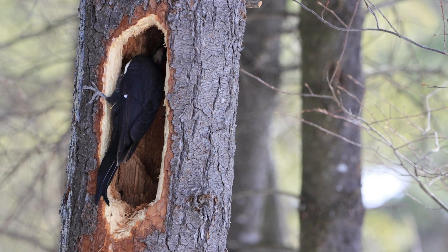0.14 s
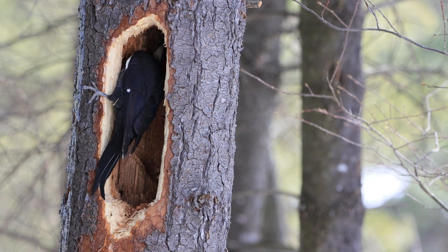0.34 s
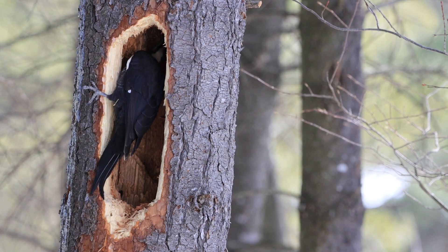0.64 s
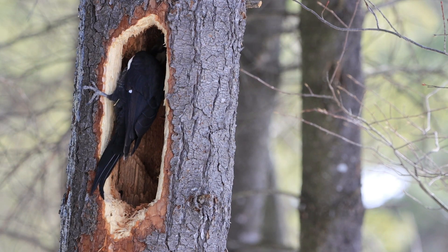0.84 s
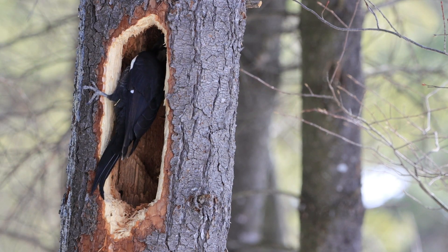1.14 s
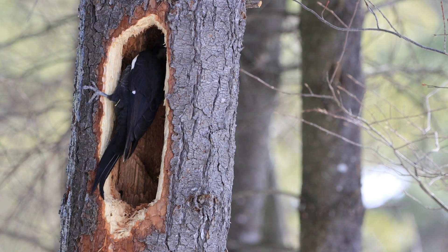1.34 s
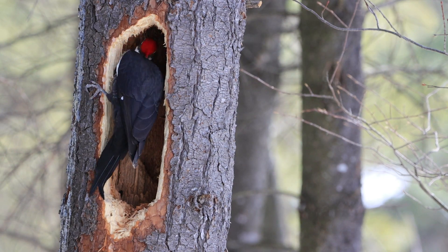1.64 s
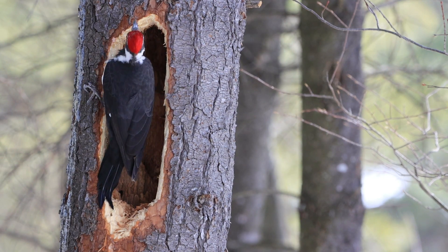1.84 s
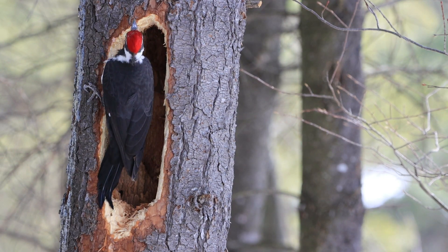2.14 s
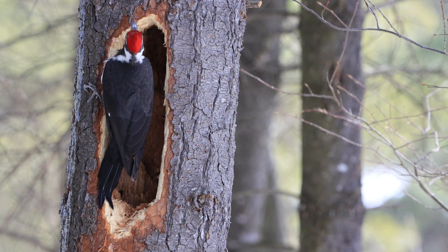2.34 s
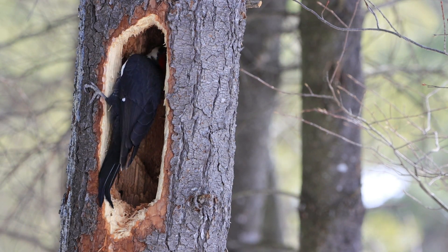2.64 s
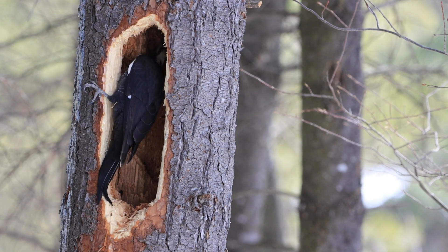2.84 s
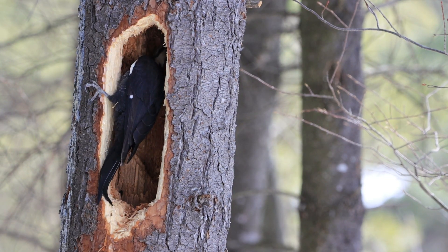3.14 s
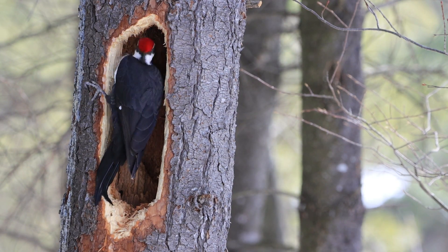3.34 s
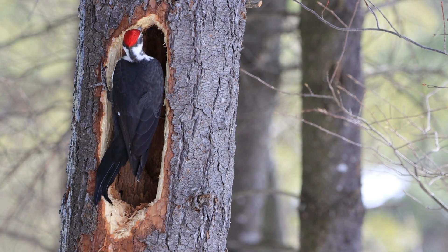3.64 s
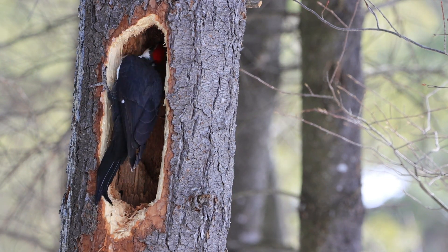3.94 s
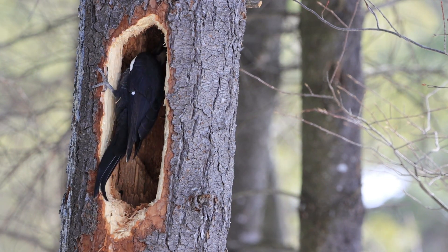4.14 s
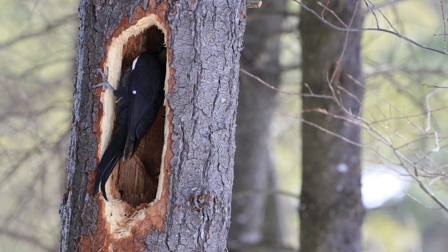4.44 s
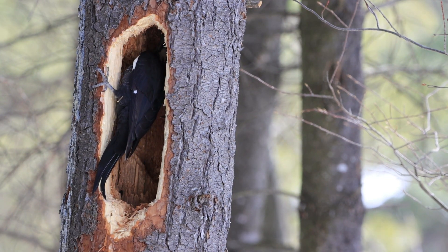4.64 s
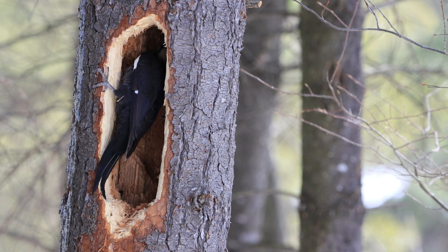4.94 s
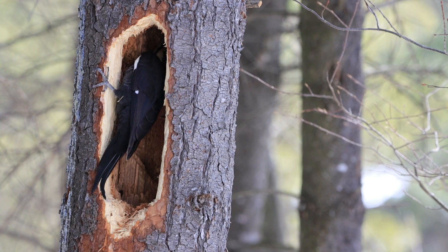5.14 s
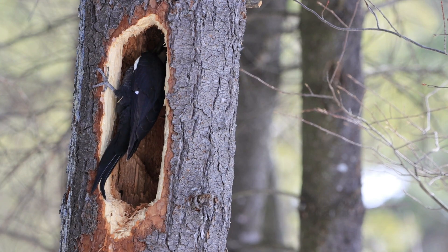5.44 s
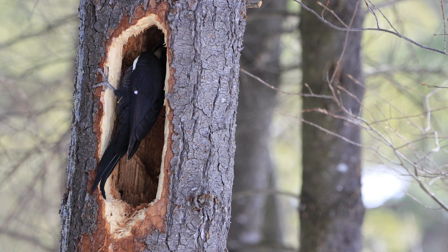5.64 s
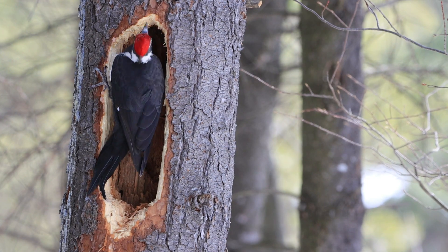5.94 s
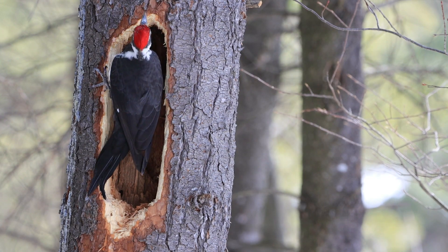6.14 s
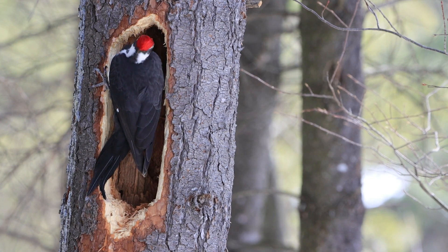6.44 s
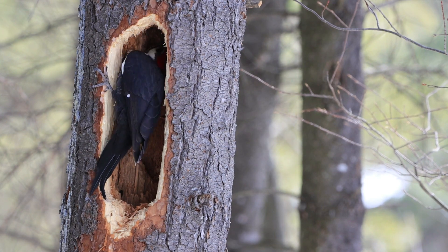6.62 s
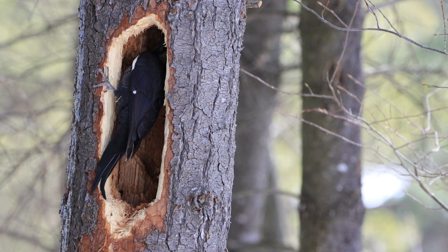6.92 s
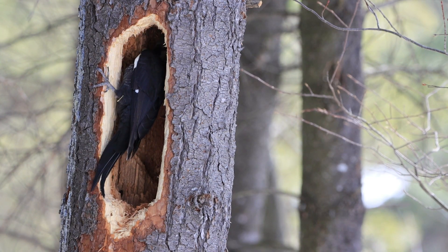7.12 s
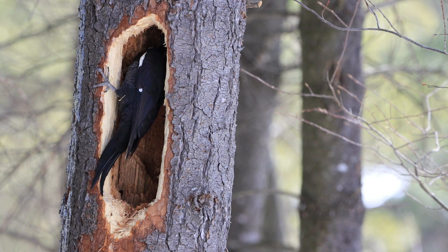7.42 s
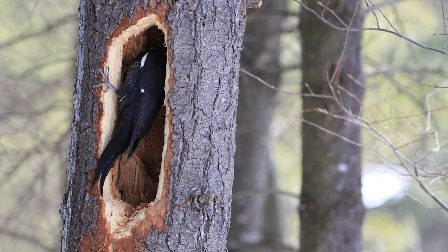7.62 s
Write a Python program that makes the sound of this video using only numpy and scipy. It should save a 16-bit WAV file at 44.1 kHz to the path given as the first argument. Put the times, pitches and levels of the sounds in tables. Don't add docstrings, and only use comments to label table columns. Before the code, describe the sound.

A quiet wood with soft air hiss, a throbbing high insect band, low distant rumble and a faint steady machine hum. From 0.3 to 1.1 s a small bird gives ten even, high chips, amid thin seeps and pips; a breathy high whistle follows at 1.3-1.8 s, with a tiny twig snap near 1.7. At 2.3 s a large woodpecker starts yelping: two or three softer, lower notes, then loud, bright, ringing ones about 0.12 s apart until 4.0, closing with a clipped higher note at 4.15. Trunks return each yelp. Over its start, two piercing whistles glide down, 2.4-2.8 s. Fuzzy high trills buzz near 3 and 5 s. Scattered chips and faint murmurs continue. From 5.65 s a distant bird repeats a quick four-note phrase, about three times a second, fading after 7 s as hiss and insects die away, leaving rumble and hum.

```python
import sys
import numpy as np
from scipy import signal
from scipy.io import wavfile
from scipy.ndimage import uniform_filter1d

SR = 44100
rng = np.random.default_rng(int(sys.argv[2]) if len(sys.argv) > 2 else 0)


def boost_factor(decibels):
    exponent = np.asarray(decibels, float) / 20
    return 10 ** exponent


def pcm_store(signal):
    levels = np.round(np.clip(np.atleast_2d(signal), -1, 1) * 32767)
    wavfile.write(sys.argv[1], SR, levels.astype(np.int16).T)


N = 343098
BIN_HZ = np.fft.rfftfreq(1024, 1 / SR)

# (frequency [Hz], level [dB])
RUMBLE_SHAPE = [(18, -52), (30, -32.5), (50, -6.5), (95, 0), (190, -5), (215, -8.5), (330, -15.5),
                (700, -15.5), (1100, -25), (1700, -30), (16000, -45)]


def evened(x):
    return x / np.sqrt(np.mean(x ** 2) + 1e-20)


def read(points, hz):
    f, value = np.transpose(points)
    return np.interp(np.log(hz + 1), np.log(f + 1), value)


def along(rows, column):
    rows = np.array(rows)
    return np.interp(np.arange(N) / SR, rows[:, 0], rows[:, column])


def add(mix, s, sound):
    part = mix[round(s * SR):][:len(sound)]
    part += sound[:len(part)]


def drift(count, hz):
    pole = np.exp(-np.pi * hz / SR)
    z = rng.standard_normal((count + 2000, 2)) @ [1, 1j]
    for _ in range(2):
        z = signal.lfilter([1], [1, -pole], z)
    z = z[2000:]
    return z / np.sqrt(np.mean(abs(z) ** 2))


def whistle(hz, rough, width_hz):
    rough = np.clip(rough, 0, 1)
    carrier = np.sqrt(1 - rough) + np.sqrt(rough) * drift(len(hz), width_hz)
    carrier = carrier / np.sqrt(np.mean(abs(carrier) ** 2))
    turns = np.cumsum(hz) / SR + rng.random()
    return (carrier * np.exp(2j * np.pi * turns)).real


def noise(shape_db, patchy_db):
    a, b, patches = rng.standard_normal((N // 256 + 5, 513, 3)).T
    patches = uniform_filter1d(uniform_filter1d(patches, 12, 0), 14, 1)
    z = (a + 1j * b) * boost_factor(shape_db[:, None] + patchy_db * evened(patches))
    return signal.istft(z, nperseg=1024, noverlap=768)[1][:N]


def note(s, length_s, start_hz, end_hz, db, rough, width_hz=300):
    hz = np.geomspace(start_hz, end_hz, int(length_s * SR))
    return s, boost_factor(db) * whistle(hz, rough, width_hz) * signal.windows.tukey(len(hz), .4)


def held(rows, rough, width_hz, trim_db):
    s, hz, db = np.transpose(rows)
    t = np.arange(s[0], s[-1], 1 / SR)
    tone = whistle(np.interp(t, s, hz), rough, width_hz)
    return s[0], boost_factor(np.interp(t, s, db) + trim_db) * tone * signal.windows.tukey(len(t), .08)


def arched(s, db, hz, length_s, drop, rough=0.25):
    u = np.linspace(-1, 1, int(length_s * SR))
    tone = whistle(hz * (1 - drop * u ** 2), rough, width_hz=60)
    return s, boost_factor(db) * tone * (1 - u ** 2) ** 0.69


def hiss():
    # (frequency [Hz], level [dB])
    air_shape = [(60, 7), (400, 10.5), (900, 8), (1500, 5.5), (2400, 9.5), (4400, 4.5), (6800, 9.5),
                 (8200, 1), (9600, -3), (16000, 3)]
    return boost_factor(9.5) * evened(noise(read(air_shape, BIN_HZ), patchy_db=.9))


def insects():
    # (centre [Hz], width [Hz], level over the air [dB])
    bands = [(5417, 450, -1.5), (5837, 310, 2)]
    chorus = np.zeros(N)
    for hz, width_hz, db in bands:
        throb = 1 + 0.086 * evened(drift(N, hz=40.8).real)
        chorus += boost_factor(db + 7.5) * throb * whistle(np.full(N, hz), rough=0.96, width_hz=width_hz)
    return chorus


def woodland_air():
    # (time [s], level [dB])
    swell = [(0.0, -62.5), (0.13, -62), (1.1, -56.5), (1.82, -56), (2.66, -54.5), (3.16, -55.5), (4.9, -56),
             (5.83, -60), (6.69, -63.5), (7.19, -70.5), (7.52, -78.5), (7.78, -93.5)]
    return (hiss() + insects()) * boost_factor(along(swell, 1))


def rumble():
    # (frequency [Hz], side under mid [dB])
    side_shape = [(30, -22), (150, -19.5), (300, -10.5), (800, -3), (1700, -0.5), (16000, -2.5)]
    mid = noise(read(RUMBLE_SHAPE, BIN_HZ), patchy_db=-0.5)
    side = noise(read(RUMBLE_SHAPE, BIN_HZ) + read(side_shape, BIN_HZ), patchy_db=-1.4)
    return boost_factor(-49.5) / np.std(mid) * np.array([mid + side, mid - side])


def hum():
    # (time [s], shared level [dB], left-minus-right level [dB])
    paths = [(0.0, -50, -69), (2.06, -48.5, -72), (2.2, -50.5, -72), (3.77, -51, -68.5),
             (4.33, -48.5, -68.5), (5.61, -51, -62), (5.92, -50, -62.5), (6.35, -56.5, -62.5),
             (6.57, -55, -63), (7.02, -48.5, -63.5), (7.78, -46.5, -65)]
    turns = 2 * np.pi * 287.7 * np.arange(N) / SR
    mid = np.sqrt(2) * boost_factor(along(paths, 1)) * np.sin(turns)
    side = np.sqrt(2) * boost_factor(along(paths, 2)) * np.sin(turns + 1.0)
    return np.array([mid + side, mid - side])


def far_chorus(mix):
    # (time [s], peak [dB])
    swells = [(.1, -56.5), (.4, -50.5), (.67, -48.5), (.98, -57), (4.9, -64), (5.1, -52), (5.369, -53),
              (5.665, -47)]
    hz, rise_s, fall_s, edge_db = 2373, 0.05, 0.174, -22
    for s, db in swells:
        curve = [(s - rise_s, hz, edge_db), (s, hz, 0), (s + fall_s, hz, edge_db)]
        add(mix, *held(curve, rough=0.99, width_hz=92, trim_db=db - 1.0))


def scattered_birds(mix):
    # (time [s], length [s], start pitch [Hz], peak [dB])
    flicks = [(.225, .05, 6370, -51), (.27, .03, 6920, -56), (4.183, 0.0348, 3570, -50.5),
              (4.302, 0.037, 2764, -44), (4.518, 0.046, 2940, -49), (4.812, 0.045, 2880, -47.5),
              (5.095, 0.066, 2740, -50), (5.17, 0.068, 3080, -51), (5.39, 0.053, 2800, -49.5),
              (5.41, .04, 3340, -51.5)]
    pips = [(.233, 0.037, 3750, -50), (.862, 0.022, 4500, -40), (.89, .05, 4400, -49),
            (1.16, .05, 4170, -46), (1.05, .03, 4550, -49), (1.28, .025, 4550, -50), (1.34, .02, 4560, -46),
            (1.358, .022, 4850, -43), (1.512, 0.03, 4140, -43), (1.205, .02, 3170, -49),
            (1.535, .022, 4560, -38), (1.56, .04, 4330, -46), (1.665, 0.03, 4050, -43),
            (1.72, .08, 4050, -47), (1.69, .02, 4520, -43), (1.705, .025, 4720, -41),
            (1.83, .018, 4480, -39), (1.86, .02, 4400, -46), (2.045, .04, 3330, -47),
            (1.88, .025, 2250, -49), (2.155, .03, 2250, -48), (2.543, .036, 4130, -47.5),
            (2.695, 0.022, 4740, -40.5), (3.25, .032, 4030, -43.5), (.945, .045, 3320, -42),
            (1.01, .04, 3280, -50), (.75, .03, 2880, -51), (6.708, 0.029, 3690, -53),
            (6.782, .025, 3225, -47.5), (1.47, .04, 2320, -50), (1.675, .025, 2300, -49),
            (5.13, .12, 3650, -54), (4.84, .1, 3650, -56)]
    slurs = [(.493, .174, 8570, -58), (2.45, 0.054, 8900, -35), (5.48, .07, 6900, -44),
             (5.5, .06, 8500, -50), (3.18, .14, 8500, -51.5), (3.998, .099, 6780, -45),
             (5.55, .12, 8700, -58), (4.66, .07, 8800, -51), (6.65, .05, 8600, -54)]
    seeps = [(.645, 0.027, 6450, -37.5), (.93, 0.031, 7660, -37), (1.097, 0.025, 8050, -43),
             (1.14, 0.022, 6540, -37), (1.213, 0.018, 6410, -36), (1.26, 0.09, 8450, -49),
             (1.16, .1, 8950, -50), (2.16, 0.17, 9250, -59.5), (2.258, 0.065, 8440, -52),
             (3.33, 0.08, 6230, -40.5), (3.685, 0.026, 8730, -42), (4.086, .012, 7800, -38.5),
             (4.533, 0.018, 7290, -36), (4.05, .04, 6280, -44), (4.55, .11, 7900, -46),
             (5.364, .027, 6910, -44), (5.402, 0.032, 7400, -47), (5.97, .03, 7720, -60),
             (6.135, .02, 8200, -51), (5.365, .02, 8700, -48), (6.443, 0.013, 7840, -40),
             (6.49, 0.02, 6900, -44), (6.5, .1, 7700, -52), (6.49, .05, 8350, -56), (6.52, .08, 9150, -57),
             (3.74, .04, 6500, -48), (4.16, .17, 9000, -56), (3.89, .05, 8950, -58), (3.98, .02, 8450, -53),
             (7.343, .014, 7710, -54), (7.168, 0.023, 6450, -50), (7.191, 0.034, 6900, -51)]
    drops = [(.955, 0.018, 2800, -43.5), (4.585, 0.018, 2300, -42), (1.072, 0.0146, 2780, -33),
             (1.218, 0.018, 2780, -36), (4.427, 0.0275, 2770, -42), (4.558, 0.027, 2750, -40)]
    holds = [(.96, 0.028, 2363, -44.5), (1.083, 0.025, 2370, -38.5), (1.228, 0.044, 2370, -38),
             (1.275, 0.022, 2320, -40), (4.445, 0.035, 2410, -45), (4.575, .04, 2380, -34.5),
             (5.365, 0.036, 2320, -46.5)]
    dives = [
        (2.006, .075, 4610, -50),
        (3.705, .039, 8870, -41.5),
    ]
    rips = [
        (4.078, .012, 6400, -39),
        (6.432, .016, 6370, -36.5),
    ]
    murmurs = [(4.78, 0.39, 1340, -51.5), (4.87, 0.27, 1720, -57.5), (5.19, .04, 1740, -55),
               (5.478, 0.056, 960, -49), (6.076, 0.081, 1363, -49.5), (6.15, 0.31, 1527, -54)]
    # (table, end pitch over start pitch, roughness 0-1, flutter [Hz])
    kinds = [(flicks, 1.27, 0.95, 700), (pips, 1.01, 0.55, 200), (slurs, .9, .6, 390),
             (seeps, 0.98, 0.36, 440), (drops, .9, 0.35, 250), (holds, .99, .6, 150),
             (dives, .715, 0.5, 400), (rips, 1.26, .15, 300), (murmurs, 1.005, 0.98, 310)]
    for table, slide, rough, flutter_hz in kinds:
        for s, length_s, hz, db in table:
            add(mix, *note(s, length_s, hz, hz * slide, db - 2.5, rough, flutter_hz))


def hooked_strokes(mix):
    # (time [s], length [s], top pitch [Hz], peak [dB])
    hooks = [(0.303, .3, 8450, -68), (1.1, .28, 8950, -62), (4.538, 0.21, 9370, -58),
             (5.37, 0.18, 9100, -56.5), (5.403, 0.13, 7660, -48.5), (7.159, 0.19, 8780, -69),
             (7.188, 0.14, 7350, -62)]
    top_at, rise, fall = .25, 0.0454, 0.22
    for s, length_s, hz, db in hooks:
        u = np.linspace(0, 1, int(length_s * SR))
        rising = rise * (1 - u / top_at) ** 2
        falling = fall * ((u - top_at) / (1 - top_at)) ** 2
        pitch_hz = hz * (1 - np.where(u < top_at, rising, falling))
        level = boost_factor(db + 5.2 * abs(2 * u - 1) ** 3) * signal.windows.tukey(len(u), .08)
        add(mix, s, level * whistle(pitch_hz, rough=0.47, width_hz=420))


def chips(mix):
    # (time [s], peak [dB])
    series = [(0.3255, -39.5), (0.413, -35), (0.4868, -32), (0.5738, -33), (0.6546, -36), (0.732, -32),
              (0.814, -30.5), (0.8962, -30.5), (0.964, -29.5), (1.061, -33)]
    for s, db in series:
        since_s = s - series[0][0]
        hz = 6890 - 320 * since_s
        lower_db = db + min(-21.5 + 9 * since_s, -9.5)
        add(mix, *note(s, 0.037, hz * 1.004, hz * .996, db - 8, 0.85, width_hz=200))
        add(mix, *note(s - .004, 0.028, hz / 2, hz / 2, lower_db + 1.5, 0.14, width_hz=160))


def thin_whistle(mix):
    # (time [s], pitch [Hz], level [dB])
    curve = [(1.26, 6468, -54.5), (1.28, 6400, -48), (1.316, 6160, -39), (1.514, 6324, -30),
             (1.564, 6360, -37.5), (1.58, 6420, -29.5), (1.76, 6250, -44), (1.782, 6350, -53.5),
             (1.85, 6260, -59.5)]
    add(mix, *held(curve, rough=0.92, width_hz=160, trim_db=1.0))


def twig(mix):
    # (time [s], peak [dB])
    snap = [
        (1.7085, -51.5),
    ]
    s, db = snap[0]
    add(mix, *note(s, .0005, 13000, 7000, db + 15, 0))


def arched_whistles(mix):
    # (time [s], peak [dB], top pitch [Hz], length [s], pitch drop 0-1)
    arches = [
        (1.764, -48, 2740, 0.125, 0.3),
        (2.265, -48, 2730, 0.08, 0.15),
    ]
    for row in arches:
        add(mix, *arched(*row))


def yelp(s, db, hz, second_db, kick_db):
    slow = np.clip((1125 - hz) / 50, 0, 1)
    lead_s = .0085 + .005 * slow
    t = np.arange(-lead_s, .048, 1 / SR)
    since = t + lead_s

    curve = np.where(t < .023, 100 + 95 * slow, 80)
    bend = np.minimum(curve * (t - .023) ** 2, .165)
    scoop = 0.18 * (1 - 0.92 * slow) * np.exp(-since / 0.0036)
    turns = 2 * np.pi * np.cumsum(hz * 1.017 * (1 - bend - scoop)) / SR

    shut = np.sin(np.pi / 2 * np.clip((.0445 - 0.005 * slow - t) / 0.014, 0, 1)) ** 2
    body = np.sin(np.pi / 2 * np.clip((t + 0.0069) / 0.011, 0, 1)) ** 2 * shut
    arch = np.exp(-((t - .022) / 0.023) ** 2)
    waver = 1 + 0.1 * drift(len(t), hz=69.0).real
    kick = np.clip(since / .002, 0, 1) * np.exp(-((since - .002) / (.0048 + .008 * slow)) ** 2)
    catch = 1 - .4 * np.exp(-((t - .021) / .003) ** 2)
    late = np.clip((t + 0.0016) / 0.005, 0, 1) ** 2 * shut

    first = boost_factor(db) * body
    second = boost_factor(second_db - 1.8) * body * arch * waver * catch + boost_factor(kick_db - 1.0) * kick
    third = boost_factor(second_db - 22 - 9 * slow) * late * waver
    upper = third * (np.sin(3 * turns) + boost_factor(-21.5) * np.sin(4 * turns))
    return s - lead_s, first * np.sin(turns) + second * np.sin(2 * turns) + upper


def woodpecker():
    # (time [s], fundamental peak [dB], top pitch [Hz], second partial [dB], opening kick [dB])
    yelps = [(2.343, -35.5, 1028, -34, -29), (2.489, -31.5, 1084, -23, -27.5),
             (2.6204, -31, 1112, -19, -31), (2.7418, -29.5, 1133, -13.5, -32.5),
             (2.8616, -30, 1139, -12.5, -30.5), (2.9846, -30, 1146, -12, -37),
             (3.098, -28.5, 1154, -10, -39), (3.2166, -26.5, 1163, -9.5, -32.5),
             (3.335, -26.5, 1162, -10, -32), (3.4491, -27, 1164, -10.5, -31),
             (3.5609, -26.5, 1172, -11, -34.5), (3.674, -27, 1164, -9.5, -27.5),
             (3.7891, -25.5, 1176, -9.5, -31.5), (3.9041, -26, 1169, -11, -30.5),
             (4.0209, -27, 1157, -10, -27.5)]
    # (time [s], peak [dB], top pitch [Hz])
    closing = [
        (4.1463, -24.5, 1653),
    ]
    mix = np.zeros(N)
    for row in yelps:
        add(mix, *yelp(*row))
    s, db, hz = closing[0]
    add(mix, *arched(s - .003, db - .4, hz * 1.01, length_s=0.024, drop=0.08, rough=0.018))
    return mix


def gliding_whistles(mix):
    # (time [s], pitch [Hz], level [dB])
    glides = [
        [(2.36, 11760, -60.5), (2.4, 11530, -43.5), (2.424, 10700, -39), (2.43, 9840, -37.5),
         (2.49, 7400, -32.5)],
        [(2.48, 7300, -43.5), (2.494, 6840, -27), (2.548, 6050, -27), (2.612, 5780, -19.5),
         (2.636, 5560, -18.5), (2.74, 5300, -27), (2.76, 5190, -16.5), (2.795, 4940, -27), (2.81, 4940, -36)],
    ]
    add(mix, *held(glides[0], rough=0.6, width_hz=810, trim_db=-3.5))
    add(mix, *held(glides[1], rough=0.2, width_hz=80, trim_db=-1.0))


def buzzes(mix):
    # (time [s], length [s], centre [Hz], peak [dB])
    fuzzy = [
        (2.944, .55, 7000, -49.5),
        (3.87, .18, 6950, -55.5),
        (4.85, .5, 7040, -51),
    ]
    edge_db = -5.5
    for s, length_s, hz, db in fuzzy:
        swell = [(s, hz, edge_db), (s + .4 * length_s, hz, 0), (s + length_s, hz, edge_db)]
        add(mix, *held(swell, rough=0.72, width_hz=760, trim_db=db + 2.0))


def phrase(mix):
    # (time [s], peak [dB])
    high = [(5.6632, -39.5), (5.9973, -33), (6.334, -34), (6.668, -35), (7.008, -39.5), (7.362, -50)]
    low = [(5.772, -45.5), (6.102, -42.5), (6.4284, -41.5), (6.776, -47), (7.128, -51)]
    middle = [(5.8486, -36), (6.1838, -35), (6.5031, -36.5), (6.8548, -38.5), (7.1894, -45.5)]
    tick = [(5.9373, -37.5), (6.274, -34.5), (6.608, -38.5), (6.9474, -40), (7.2968, -42)]
    # (lead [s], length [s], start pitch [Hz], end pitch [Hz], trim [dB])
    steps = [
        (.003, .025, 2470, 3060, 1),
        (-.038, .014, 2850, 2950, -8),
        (.013, .09, 1730, 1930, -4),
        (.045, .05, 1960, 2190, -12),
        (.004, .022, 2170, 2250, -1),
        (-.026, .03, 2270, 2370, -4),
        (.003, .009, 3800, 4150, -8),
        (-.005, .01, 4000, 3880, -11),
        (-.004, .022, 3170, 3200, -15),
    ]
    owners = 2 * [high] + [low] + 3 * [middle] + 3 * [tick]
    for table, (lead_s, *shape, trim_db) in zip(owners, steps):
        for s, db in table:
            add(mix, *note(s - lead_s, *shape, db + trim_db, rough=0.2, width_hz=120))


def trunks(x, trim_db):
    # (delay [s], level [dB])
    slaps = [(0.014, -24), (.019, -5), (.031, -22.5), (.074, -11.5), (.085, -15.5), (0.107, -18.5),
             (.47, -33), (0.531, -31.5), (0.561, -35)]
    out = x.copy()
    thin = signal.sosfilt(signal.butter(2, 1900, "high", fs=SR, output="sos"), x)
    for delay_s, db in slaps:
        add(out, delay_s, boost_factor(db + trim_db) * thin)
    return out


def wood(x, place):
    size = 3 * SR // 2
    taps = np.zeros((3, size))
    at = np.arange(200, size - 20, 20) + rng.integers(0, 20, (3, (size - 201) // 20))
    np.put_along_axis(taps, at, rng.choice([-1., 1.], at.shape), 1)
    hz, t, z = signal.stft(taps, SR, nperseg=256)
    t60_s, db = (read(np.array(place)[:, [0, k]], hz)[:, None] for k in (1, 2))
    energy = SR / 20 * t60_s / (2 * np.log(1000))
    tail = signal.istft(z * boost_factor(db - 60 * t / t60_s) / np.sqrt(energy), SR, nperseg=256)[1]
    i = np.arange(N)
    turn = 2 * np.pi * (7.3 * i / SR + .4 * np.sin(i * 11 / SR) + np.arange(3)[:, None] / 3)
    sent = x * np.cos(turn) * np.sqrt(2 / 3)
    return signal.fftconvolve(sent, tail, axes=1)[:, :N].sum(0)


def scene():
    # (frequency [Hz], t60 [s], scattered energy [dB])
    near_place = [(1150, 1.1, -13), (1660, 0.45, -12.5), (2196, 1.27, 0), (2380, 2.48, -8.5),
                  (2800, 1.0, -15), (3520, 0.58, -10.5), (9000, .5, -19.5)]
    far_place = [(1500, 1, -2), (2550, 0.68, -3.5), (3950, 0.45, -5), (5960, 0.66, -1), (10000, 0.41, -0.5)]
    small, nearer = np.zeros(N), np.zeros(N)
    for birds in (far_chorus, scattered_birds, hooked_strokes, thin_whistle,
                  gliding_whistles, buzzes, phrase):
        birds(small)
    for source in (chips, twig, arched_whistles):
        source(nearer)
    pecker = woodpecker()
    near = trunks(pecker, trim_db=-6.0) + wood(pecker, near_place)
    far = small + nearer + wood(boost_factor(2) * small + boost_factor(-1.5) * nearer, far_place)
    return near + far + woodland_air() + rumble() + hum()


def top_cut(x):
    return signal.sosfilt(signal.butter(12, 15720, fs=SR, output="sos"), x)


def record(dry):
    low_cut = signal.butter(2, 42, "high", fs=SR, output="sos")
    return top_cut(signal.sosfilt(low_cut, dry) - .001)


dry = scene()
out = record(dry)
pcm_store(out)
```